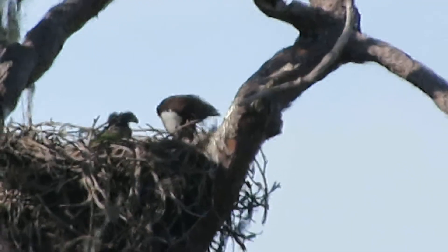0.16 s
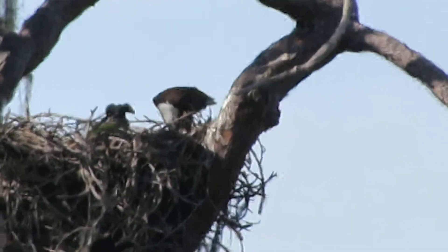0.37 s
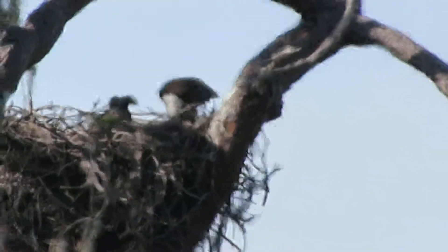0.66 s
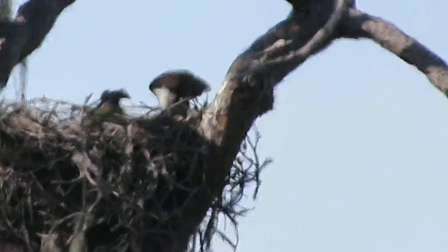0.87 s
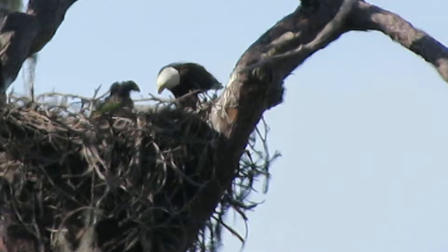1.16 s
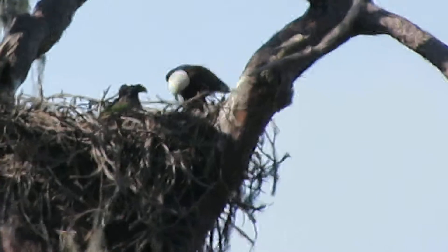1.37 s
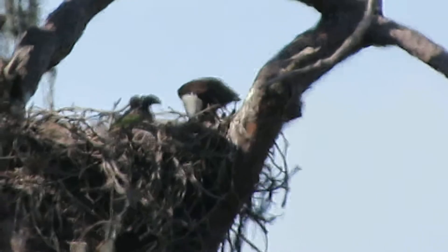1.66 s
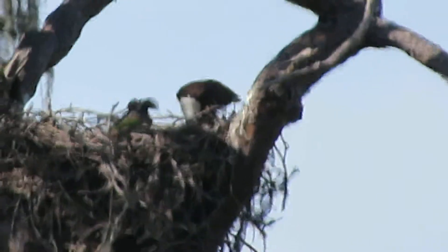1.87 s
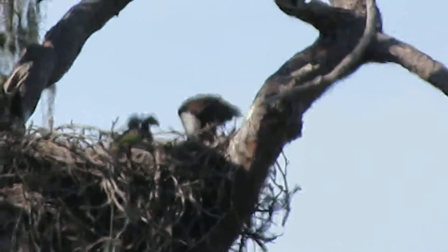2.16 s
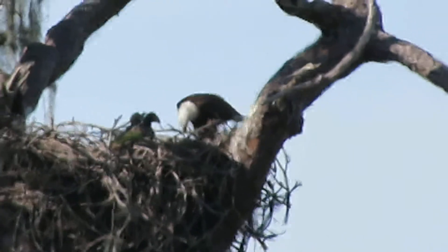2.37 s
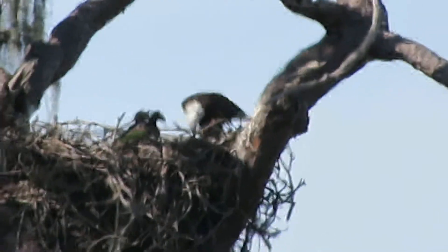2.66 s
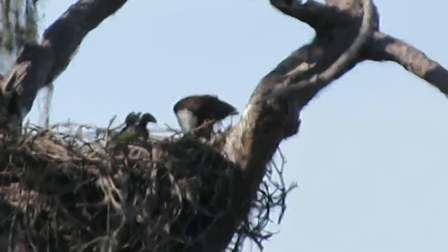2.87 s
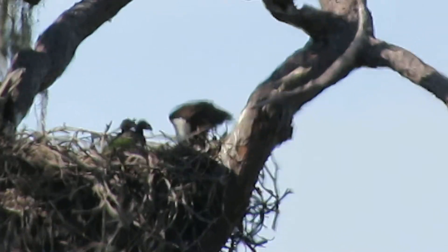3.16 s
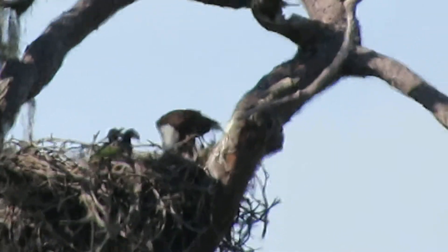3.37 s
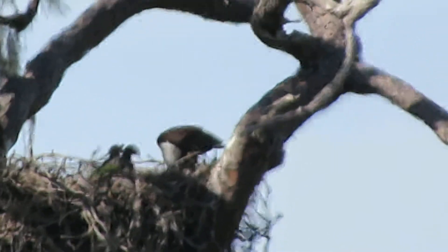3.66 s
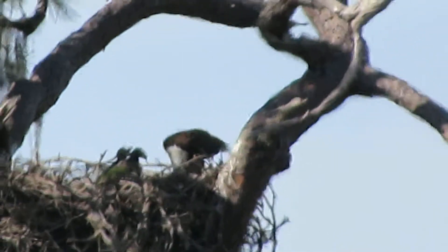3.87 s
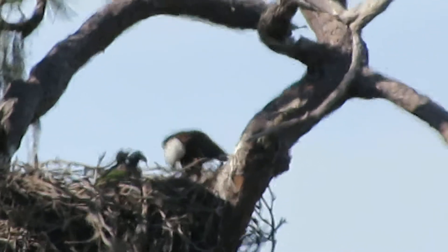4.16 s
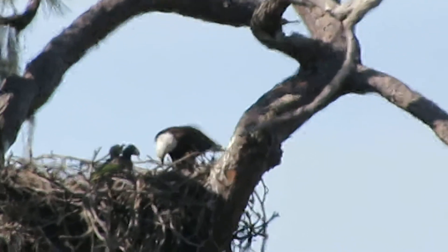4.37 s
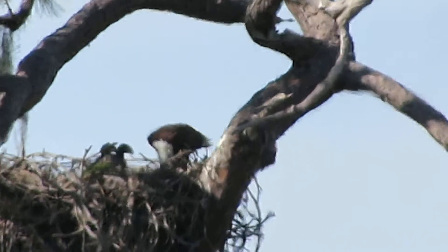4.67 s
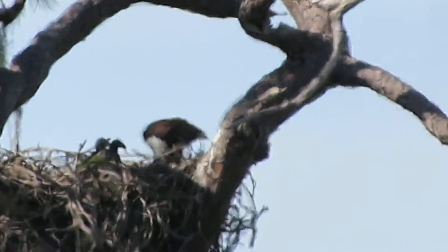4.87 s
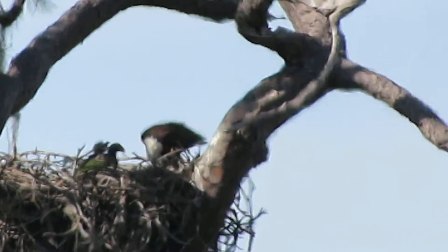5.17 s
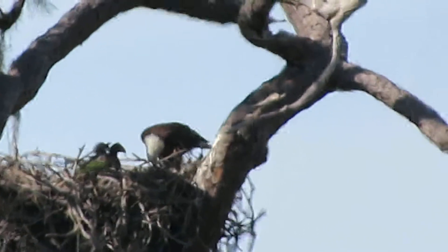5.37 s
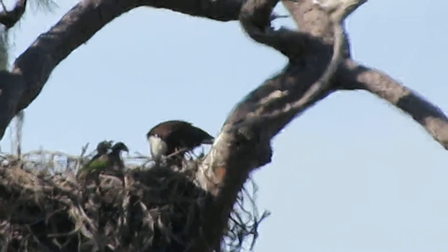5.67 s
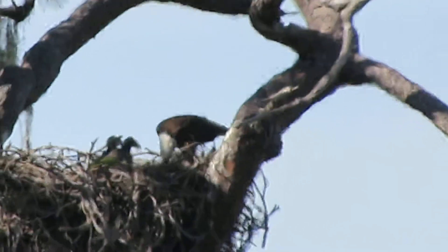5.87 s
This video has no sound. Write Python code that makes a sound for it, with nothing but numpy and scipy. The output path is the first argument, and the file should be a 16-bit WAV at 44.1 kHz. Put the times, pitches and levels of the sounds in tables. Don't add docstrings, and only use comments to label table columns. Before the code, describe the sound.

Short piping eagle calls ring out from a treetop nest, in a run of five and later a pair, above far road wash and pulsing cricket.

```python
import sys
import numpy as np
from scipy import signal
from scipy.fft import rfft, irfft
from scipy.io import wavfile
from scipy.ndimage import uniform_filter1d

SR = 44100
rng = np.random.default_rng(int(sys.argv[2]) if len(sys.argv) > 2 else 0)


def dump(signal):
    limited = np.clip(np.atleast_2d(signal).T, -1, 1)
    pcm = np.round(limited * 32767).astype(np.int16)
    wavfile.write(sys.argv[1], SR, pcm)


def voltage_ratio(level):
    return 10 ** (np.asarray(level, float) / 20)


N = 265923


def evened(x):
    return x / np.sqrt(np.mean(x ** 2) + 1e-20)


def read(points, hz):
    f, value = np.transpose(points)
    return np.interp(np.log(hz + 1), np.log(f + 1), value)


def add(mix, s, sound):
    part = mix[..., round(s * SR):][..., :sound.shape[-1]]
    part += sound[..., :part.shape[-1]]


def drift(count, span):
    size = max(int(span), 1)
    noise = rng.standard_normal(count)
    return evened(uniform_filter1d(uniform_filter1d(noise, size), size))


def ports(x, left_db, lag):
    z = rfft(x)
    left = z * voltage_ratio(left_db / 2) * np.exp(-1j * lag)
    right = z * voltage_ratio(-left_db / 2)
    return irfft([left, right], len(x))


# frequency in Hz, level in dB per Hz.
WASH = [(20, -76), (45, -64.5), (65, -60.5), (110, -63), (160, -69), (400, -73.5), (900, -77), (1300, -83),
        (2200, -88.5), (3600, -90), (5000, -94), (8500, -95.5), (12000, -103), (15000, -112)]
# frequency in Hz, likeness from -1 (inverted by the widener) to 1.
ALIKE = [(40, 1), (70, 0.83), (110, 0.72), (150, -0.35), (200, -0.4), (370, -0.76), (480, -0.58),
         (600, 0.34), (1000, -0.035), (1400, -0.21), (3000, -0.18), (6000, 0.039), (12500, -0.034),
         (14500, 0.56)]


def wash():
    rumble_swell_db, rumble_swell_s = .5, .25
    frames, hz = N // 512 + 5, np.fft.rfftfreq(2048, 1 / SR)
    a, b, c, d, patches = rng.standard_normal((frames, 1025, 5)).T
    patches = uniform_filter1d(patches, size=20, axis=0)
    patches = evened(uniform_filter1d(patches, size=8, axis=1))
    low = np.clip(2 - hz[:, None] / 150, 0, 1)
    swell_db = rumble_swell_db * drift(frames, rumble_swell_s * SR / 512) * low
    alike = np.clip(read(ALIKE, hz), -1, 1)[:, None]
    left, other = a + 1j * b, c + 1j * d
    right = 1.074 * (alike * left + np.sqrt(1 - alike ** 2) * other)
    z = np.array([left, right])
    z *= voltage_ratio(read(WASH, hz)[:, None] + 0.58 * patches + swell_db + 14.0)
    return signal.istft(z, nperseg=2048, noverlap=1536)[1][:, :N]


# time in seconds, tyre swell in dB.
PASSES = [(.28, 3), (.6, 4), (1.0, -2.5), (1.2, 1), (1.96, 4.5), (2.75, 1), (3.3, 4), (3.93, 3.5),
          (4.55, 3.5), (5.0, 0.5), (5.2, 4), (5.62, 4.5)]


def passing(t):
    between_db, pass_s = -1.5, 0.073
    return between_db + sum(db * np.exp(-.5 * ((t - s) / pass_s) ** 2) for s, db in PASSES)


# pitch in Hz, width in Hz, level in dB,
# left minus right in dB, lag of the left port in radians.
DRONES = [(591, 30.4, -58.5, -5, 0.73), (769, 70, -55.5, 0, 0.55), (822.7, 34.6, -55, -10.5, -0.73),
          (946, 11, -63.5, 0, 0.56), (904, 31, -86, 16, -0.59), (1121, 85, -64.5, 6, -0.55),
          (1540, 53, -68.5, 1, 0.88), (14430, 160, -83, -2, 0)]
# pitch in Hz, level in dB.
WHINES = [(12772, -90), (13066, -93)]


def drones():
    out, t = np.zeros((2, N)), np.arange(N) / SR
    for hz, width, db, left_db, lag in DRONES:
        band = signal.iirpeak(hz, hz / width, SR)
        noise = rng.standard_normal(N)
        ring = evened(signal.lfilter(*band, signal.lfilter(*band, noise)))
        level_db = db + 1.0 * drift(N, 8800)
        if 700 < hz < 900:
            level_db = level_db + passing(t)
        out += ports(voltage_ratio(level_db) * ring, left_db, lag)
    for hz, db in WHINES:
        out += np.sqrt(2) * voltage_ratio(db) * np.sin(2 * np.pi * hz * t)
    return out


# first stroke in seconds, end in seconds, strokes per second, peak in dB.
TRILLS = [
    (.0197, .43, 50.3, -1),
    (.5566, .65, 50.0, -8),
    (.6566, 1.49, 50.0, 0),
    (1.9576, 2.72, 49.75, -3),
    (3.0349, 3.65, 49.55, 0),
    (4.074, 4.66, 49.35, -1.5),
    (5.022, 5.64, 49.15, 0),
]


def cricket():
    cricket_db, lead_s = -52, .0017
    out, u = np.zeros(N), np.linspace(0, 1, 230)
    shape = np.sin(np.pi * u ** .8) ** 2
    for start, end, rate, db in TRILLS:
        for s in np.arange(start, end, 1 / rate):
            size, shift, turn = rng.standard_normal(3)
            hz = 9230 - 900 * u + 60 * shift
            tone = np.sin(2 * np.pi * np.cumsum(hz) / SR + 9 * turn)
            swell_db = -5 * np.exp(-(s - start) / 0.045)
            level_db = db + cricket_db + swell_db + 2.0 * size
            add(out, s - lead_s, voltage_ratio(level_db) * shape * tone)
    return ports(out, 6, 3.0)


# time in seconds, level in dB.
TICKS = [
    (.7575, -33),
]


def ticks():
    out = np.zeros((2, N))
    snap = np.array([1, .1, -.5, -.4, -.2])
    for s, db in TICKS:
        add(out, s, voltage_ratio(db) * snap * np.array([[1], [.2]]))
    return out


# frequency in Hz, level in dB.
THROAT = [(900, -3.5), (1500, -11.5), (2000, -2.5), (2450, -8.5), (2900, -3.5), (3500, -1), (4400, -10),
          (5900, -20.5), (7500, -22), (10500, -28.5), (14000, -40)]


def overtones(hz, upper_db, hoarse, flutter_db=0):
    shaken_hz = hz * (1 + .25 * hoarse * drift(len(hz), 60))
    turns = np.cumsum(shaken_hz) / SR + rng.random()
    k = np.arange(1, len(upper_db) + 1)[:, None]
    level = voltage_ratio(read(THROAT, k * hz) + upper_db)
    tone = (level * np.sin(2 * np.pi * k * turns)).sum(axis=0)
    return np.sqrt(2) * tone * voltage_ratio((7.4 * hoarse + flutter_db) * drift(len(hz), 54))


def squeak(length, hz_a, hz_b, db, low_db):
    u = np.linspace(0, 1, int(length * SR))
    upper_db = np.array([[low_db], [0], [-9.]])
    tone = overtones(hz_a + (hz_b - hz_a) * u, upper_db, 0.17)
    return voltage_ratio(db) * tone * np.sin(np.pi * u ** 1.36)


def contour(start, crest, drop, top_hz, db, rising_db, share, shoulder_db, groan_hz, sag, groan_db):
    drop_s, groan_s, release_s = .01, 0.023, 0.032
    onset_db, held_db, release_db = -14, -3, -7
    shoulder, groan_end = drop - drop_s, drop + groan_s
    s = np.array([0, crest / 2, crest, (crest + shoulder) / 2, shoulder,
                  drop, groan_end, groan_end + release_s])
    arch_hz = top_hz * np.array([.93, .93, 1, 0.98, share])
    arch_db = db + np.array([min(onset_db, rising_db), rising_db, 0, held_db, shoulder_db])
    hz = np.r_[arch_hz, groan_hz - sag * (s[5:] - drop)]
    effort_db = np.r_[arch_db, groan_db, groan_db, groan_db + release_db]
    return start + s, hz, effort_db


def yelp(s, hz, effort_db, low_db, third_db, fourth_db, higher_db, hoarse):
    t = np.arange(s[0], s[-1], 1 / SR)
    hz = uniform_filter1d(np.interp(t, s, hz), size=200, mode="nearest")
    effort_db = uniform_filter1d(np.interp(t, s, effort_db), size=100, mode="nearest")
    closing = np.clip((t - s[1]) / 0.053, 0, 1.5)
    slack = np.clip((t - s[3]) / (s[5] - s[3]), 0, 1)
    upper_db = np.array([low_db, 0, third_db, fourth_db] + 4 * [higher_db])[:, None]
    upper_db = upper_db - closing * np.array([8.0, 1.0, 16.0, 2.0, -3, 12, -10, 0])[:, None]
    upper_db = upper_db - 16 * slack * (np.arange(8) > 1)[:, None]
    throat_db = 0.54 * read(THROAT, np.fft.rfftfreq(len(t), 1 / SR))
    air = rfft(rng.standard_normal(len(t))) * voltage_ratio(throat_db)
    rasp = 2.4 * hoarse * evened(irfft(air, len(t)))
    tone = overtones(hz, upper_db, hoarse, 3.3 * slack)
    break_db = -6 * np.sin(np.pi * slack ** 2) ** 2
    return (tone + rasp) * voltage_ratio(effort_db + break_db) * signal.windows.tukey(len(t), .1)


# delay in seconds, level in dB.
ECHOES = [(.022, -25), (.045, -24), (.07, -23), (.13, -26)]


def woods_tail(voice):
    woods_db, woods_t60, rise_s = -6.5, .52, 0.0059
    t = np.arange(SR // 2) / SR
    woods = rng.standard_normal((2, len(t))) * voltage_ratio(-60 * t / woods_t60) * np.clip(t / rise_s, 0, 1)
    woods *= voltage_ratio(woods_db) / np.linalg.norm(woods[0])
    for delay, db in ECHOES:
        woods[[0, 1], round(delay * SR) + np.array([9, 0])] += voltage_ratio(db)
    dull = signal.lfilter(*signal.butter(2, 3800, fs=SR), woods)
    stir = evened(1.5 + np.array([drift(N, 110), drift(N, 110)]))
    return stir * signal.fftconvolve(voice[None], dull, axes=1)[:, :N]


# start in seconds, crest in seconds after it,
# end of the drop in seconds after it, top pitch in Hz, effort in dB.
YELPS = [
    (1.004, 0.0216, .042, 1530, -32.5),
    (1.367, 0.0193, 0.05, 1646, -33),
    (1.708, 0.0183, .035, 1495, -32),
    (2.01, .020, 0.044, 1540, -36.5),
    (2.333, 0.0153, .039, 1502, -37.5),
    (4.041, 0.0112, .039, 1473, -36.5),
    (4.357, 0.022, 0.044, 1514, -35.5),
]
# fundamental, third overtone, fourth, higher ones,
# effort halfway up, all in dB.
VOICING = [(1, 2, -6, -1.5, -7), (-1.5, 1, -6, -4, -13), (-2.5, -5, -9, -11, -3), (-5, -9, 1, -6, -8),
           (0.5, -3, 0, 0, -6), (-1, 2.5, 3, -1, -5), (-1, -3, 1.5, 0, -2.5)]
# share of the top pitch before the drop, effort there in dB,
# groan pitch in Hz, its sag in Hz per second, groan effort in dB.
FALLS = [(.9, -4.5, 1050, 1900, -49.5), (.9, -9, 1090, 2180, -49), (.94, -8, 1100, 3250, -50),
         (.92, -3, 1090, 4300, -51.5), (.85, -1, 1030, 800, -52), (.86, -3, 1075, 1970, -48.5),
         (.89, 0, 985, 1900, -49.5)]
HOARSE = [.07, .06, .07, .12, .12, .07, .07]
# start in seconds, length in seconds,
# first pitch in Hz, last pitch in Hz, level in dB.
SQUEAKS = [(0.997, .016, 1620, 1810, -55), (1.364, 0.027, 1790, 1710, -41), (1.701, 0.018, 1490, 1585, -42),
           (1.703, 0.044, 1800, 1780, -51.5), (2.008, 0.023, 1610, 1830, -42.5),
           (2.327, 0.0248, 1498, 1840, -45), (4.036, .012, 1620, 1730, -47.5),
           (4.352, 0.013, 1760, 1670, -49)]
# start in seconds, length in seconds,
# first pitch in Hz, last pitch in Hz, level in dB.
WHISTLES = [
    (1.407, 0.057, 1290, 1210, -63),
    (2.02, 0.0365, 1137, 1350, -61.5),
]
# frequency in Hz, left minus right in dB.
BIRD_LEFT = [(1500, -4), (2200, -2), (2900, -12.5), (3400, -5), (4400, -3.5), (7500, 3.5)]
# frequency in Hz, lag in radians.
BIRD_LAG = [(1000, 0.34), (3000, 0.98), (4500, 0.87), (9000, 2.5)]


def bird():
    squeak_low_db, whistle_low_db = 0.3, 20
    voice = np.zeros(N)
    for row, (*voicing, rising_db), fall, hoarse in zip(YELPS, VOICING, FALLS, HOARSE):
        path = contour(*row, rising_db, *fall)
        add(voice, row[0], yelp(*path, *voicing, hoarse))
    for s, *glide in SQUEAKS:
        add(voice, s, squeak(*glide, squeak_low_db))
    for s, *glide in WHISTLES:
        add(voice, s, squeak(*glide, whistle_low_db))
    hz = np.fft.rfftfreq(N, 1 / SR)
    direct = ports(voice, read(BIRD_LEFT, hz), read(BIRD_LAG, hz))
    return direct + woods_tail(voice)


def scene():
    return wash() + drones() + cricket() + ticks() + bird()


def ragged_top(x):
    hz, t, z = signal.stft(x, SR, nperseg=1024, noverlap=768)
    hz = hz[:, None]
    busy_db = 10 * np.log10((abs(z[:, 50:110]) ** 2).mean(axis=(0, 1)) + 1e-20)
    busy = np.clip(uniform_filter1d(busy_db - np.median(busy_db), size=6) / 18, 0, 1)
    edge_hz = 15000 + 120 * drift(len(t), 10) - 200 * busy
    holes = rng.random((len(hz) // 5 + 1, len(t) // 6 + 1))
    holes = holes.repeat(5, axis=0).repeat(6, axis=1)[:len(hz), :len(t)]
    risk = (.025 + .6 * busy) * np.clip((hz - 10000) / 4000, 0, 1) ** 2
    risk = risk * (abs(hz - 14500) > 200)
    kept = z * (hz < edge_hz) * (holes > risk)
    return signal.istft(kept, SR, nperseg=1024, noverlap=768)[1][:, :N]


def low_pass(x):
    return signal.sosfilt(signal.butter(12, 15180, fs=SR, output="sos"), x)


# pitch in Hz, width in Hz, depth from 0 to 1.
NOTCHES = [(3950, 420, .97), (7870, 280, .99)]


def record(dry):
    for hz, width, depth in NOTCHES:
        whine_band = signal.lfilter(*signal.iirpeak(hz, hz / width, SR), dry)
        dry = dry - depth * whine_band
    mix = ragged_top(dry)
    return low_pass(mix)


dry = scene()
out = record(dry)
dump(out)
```